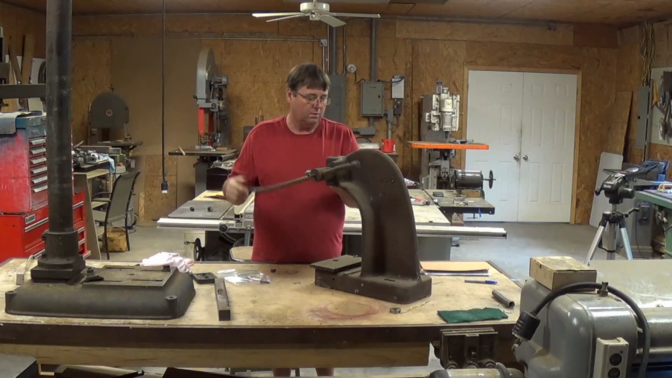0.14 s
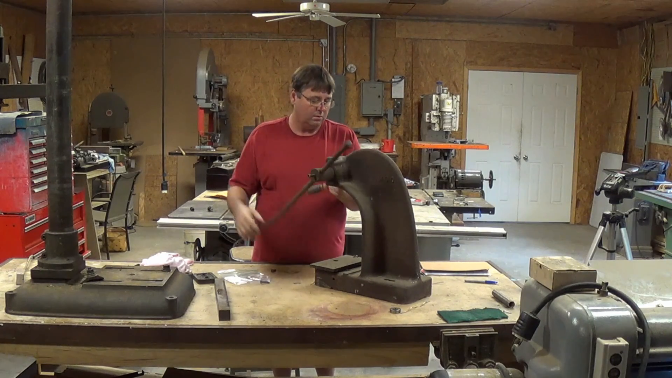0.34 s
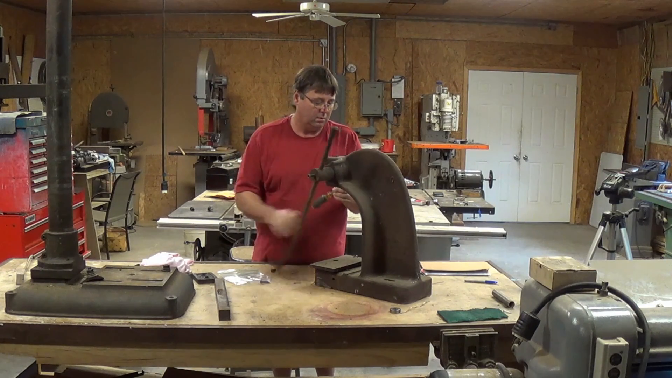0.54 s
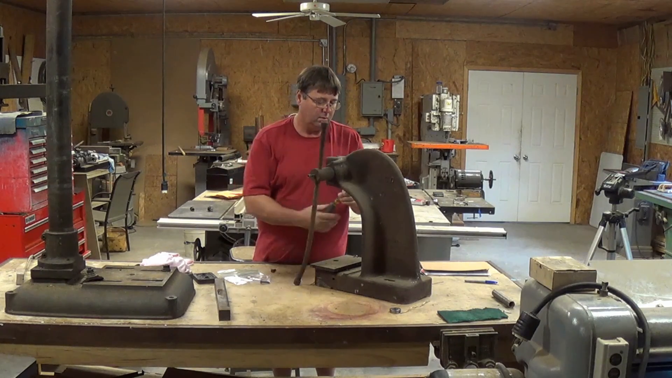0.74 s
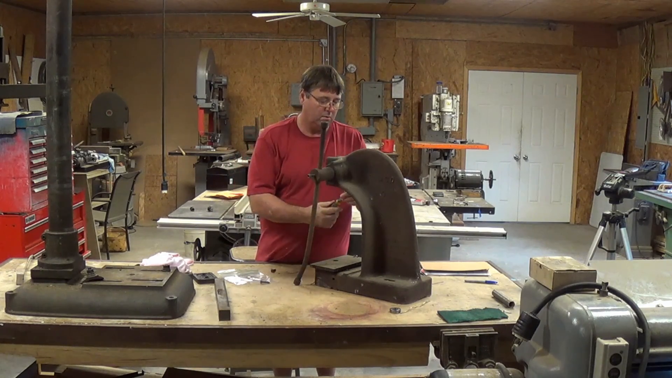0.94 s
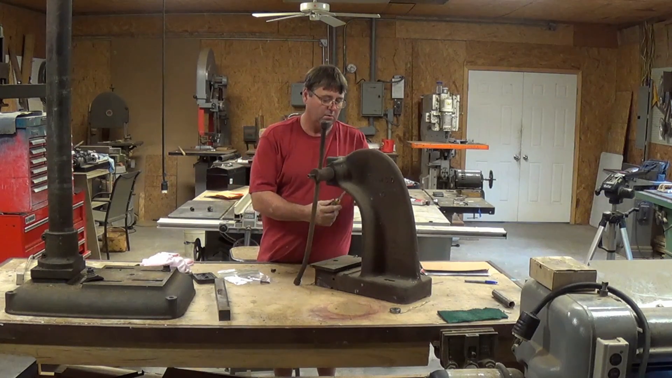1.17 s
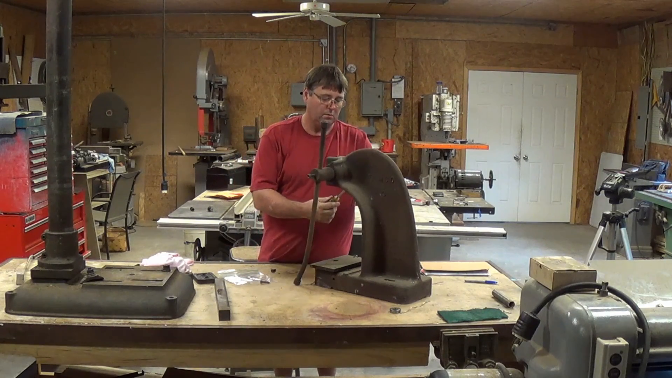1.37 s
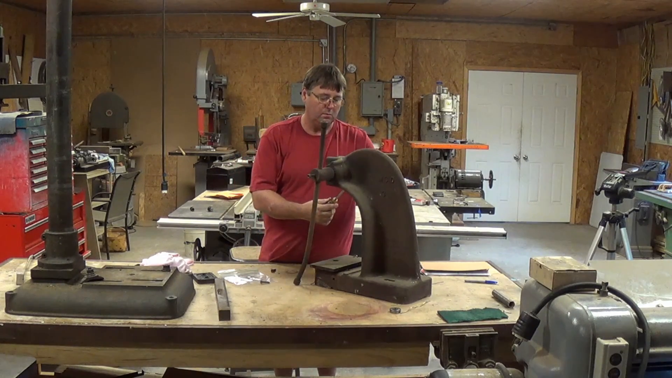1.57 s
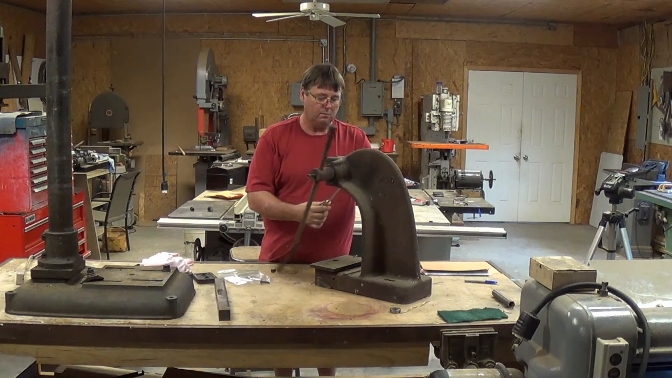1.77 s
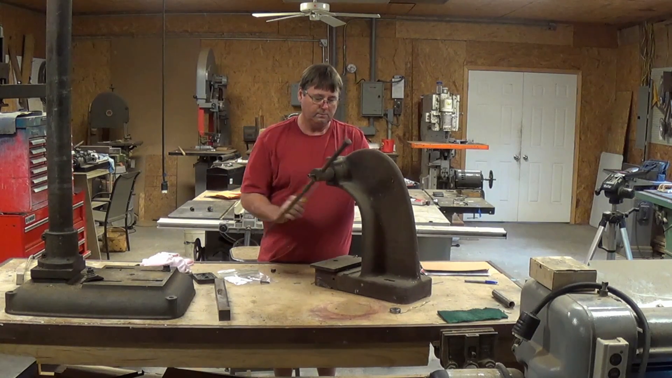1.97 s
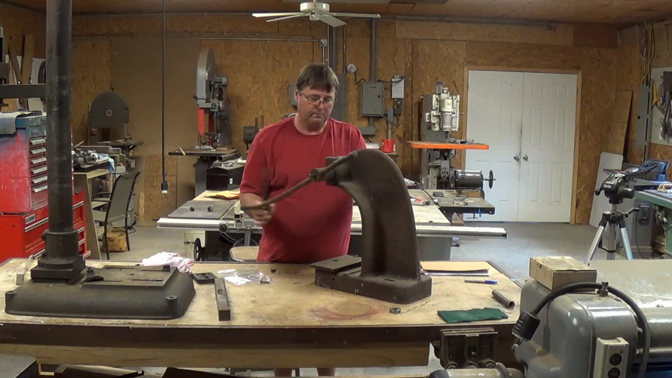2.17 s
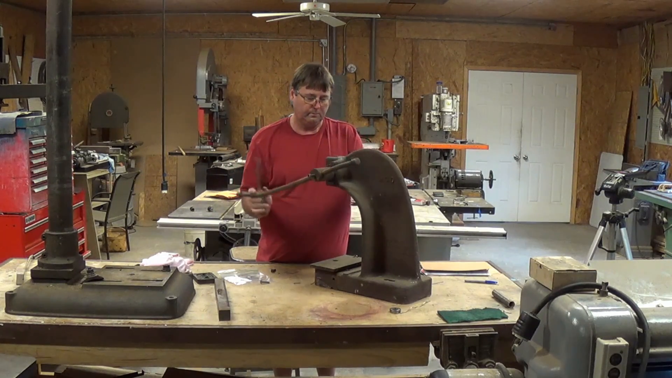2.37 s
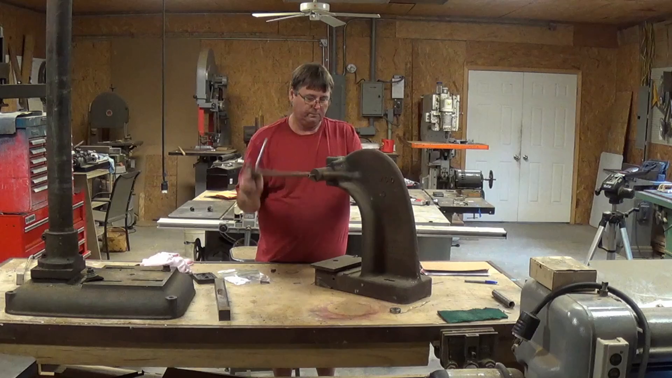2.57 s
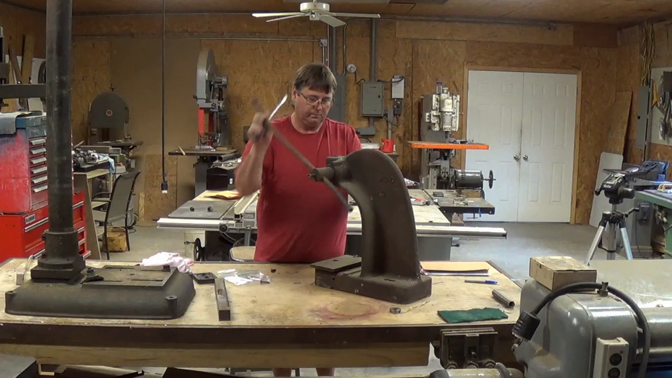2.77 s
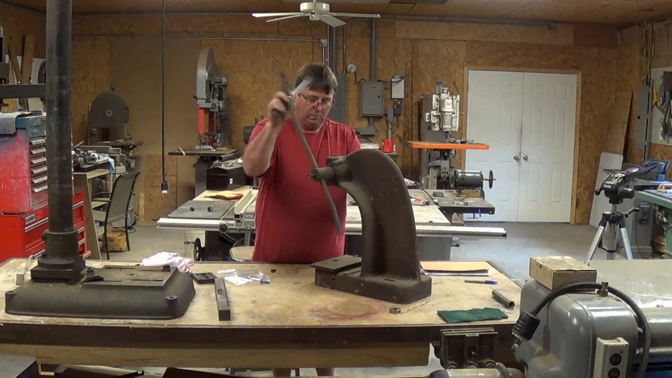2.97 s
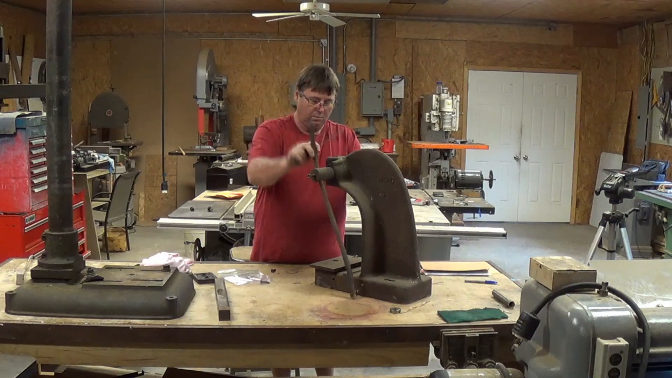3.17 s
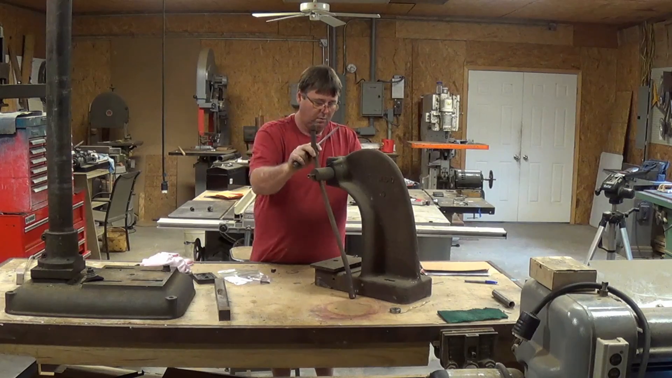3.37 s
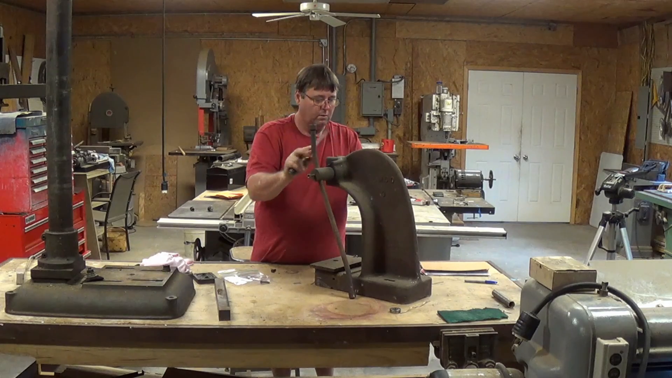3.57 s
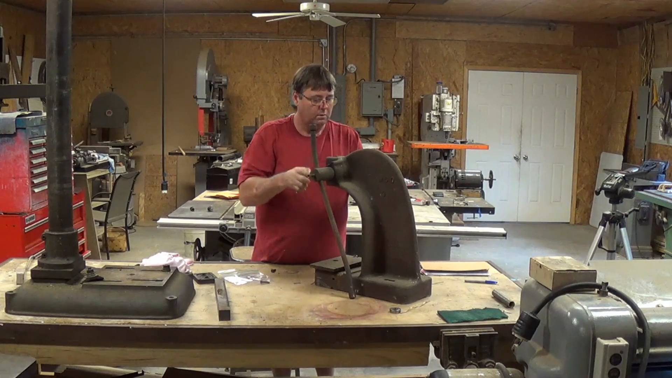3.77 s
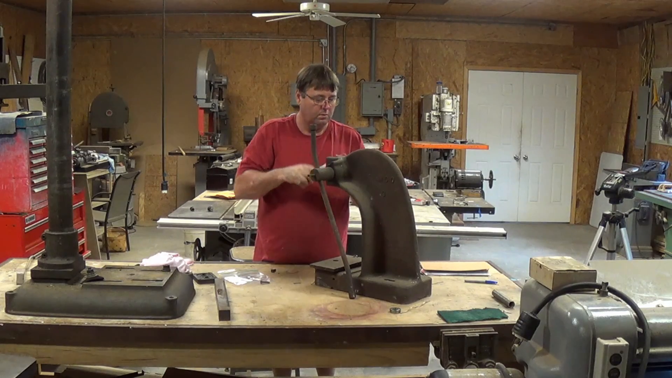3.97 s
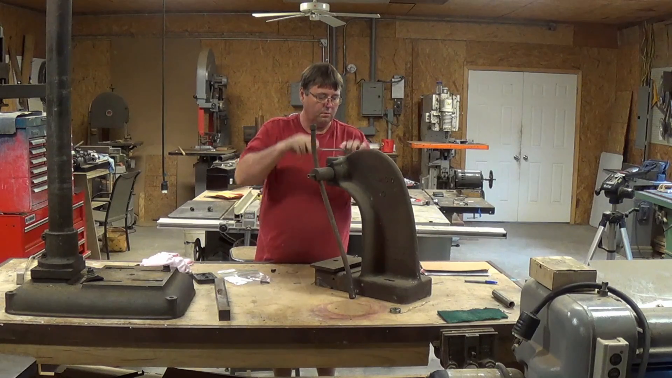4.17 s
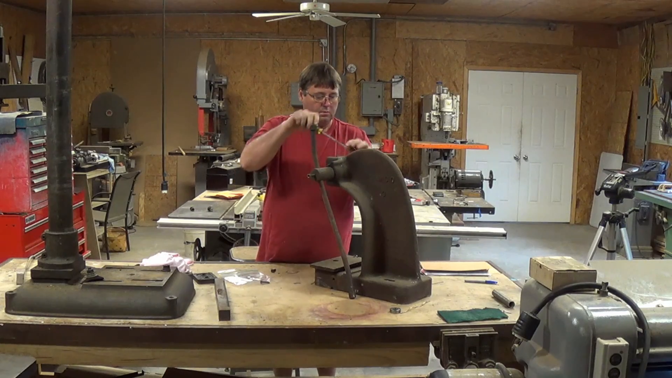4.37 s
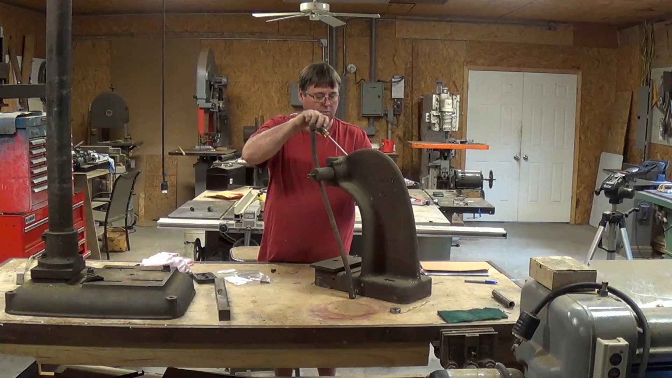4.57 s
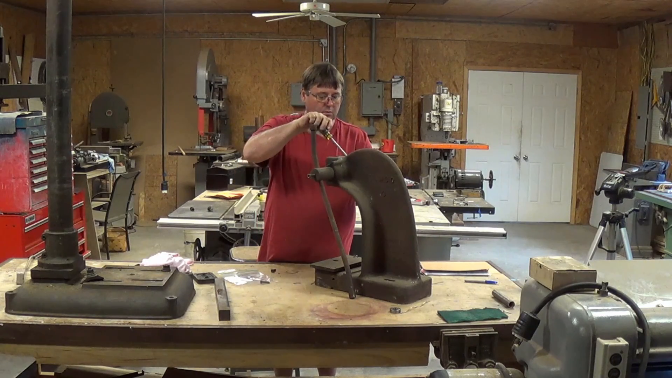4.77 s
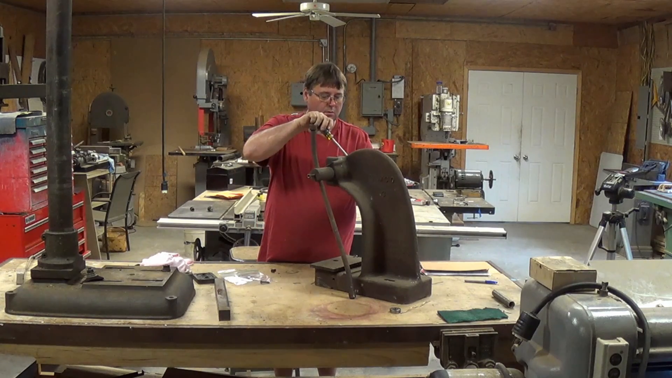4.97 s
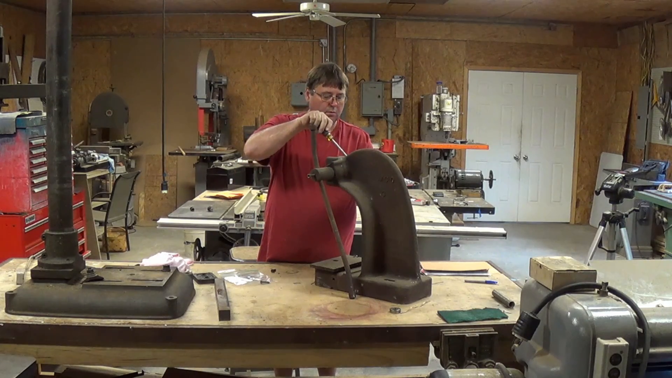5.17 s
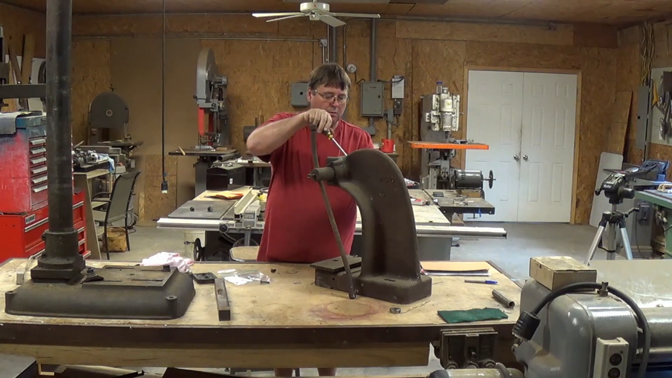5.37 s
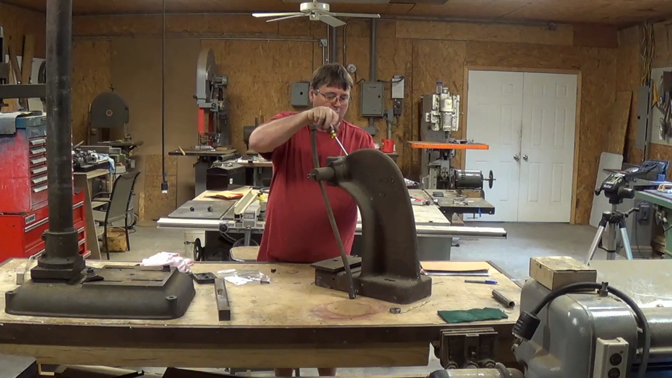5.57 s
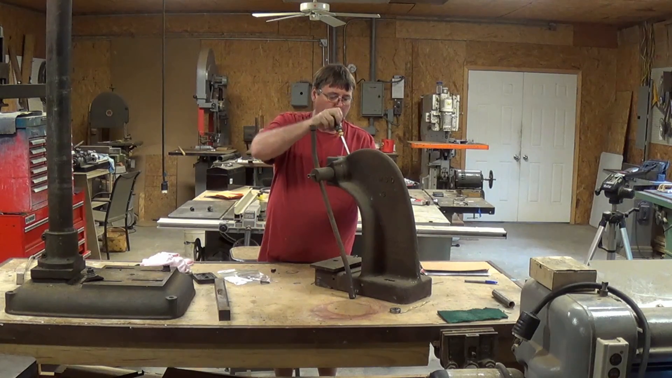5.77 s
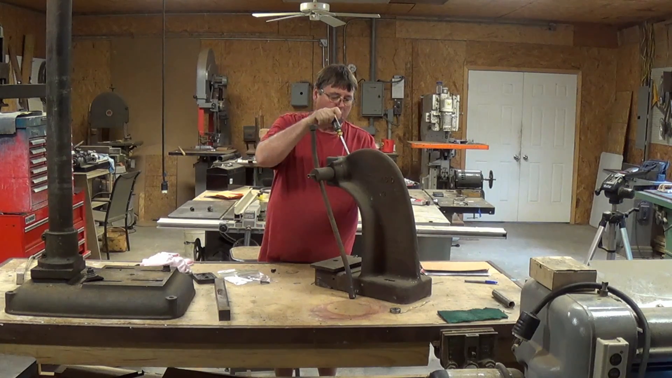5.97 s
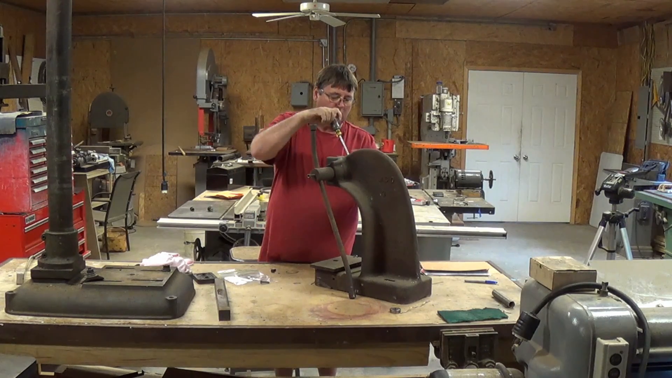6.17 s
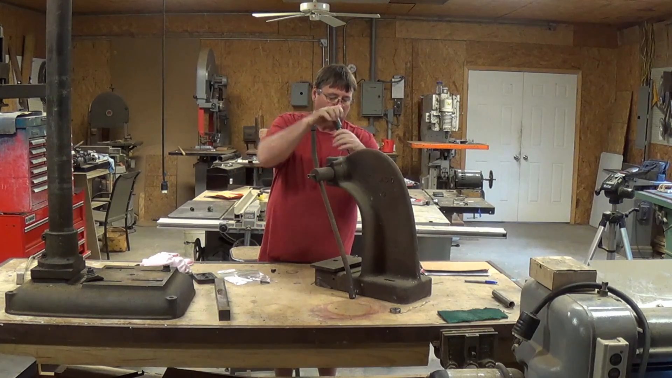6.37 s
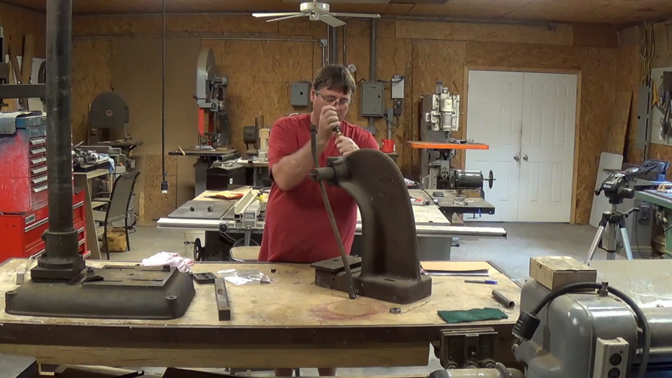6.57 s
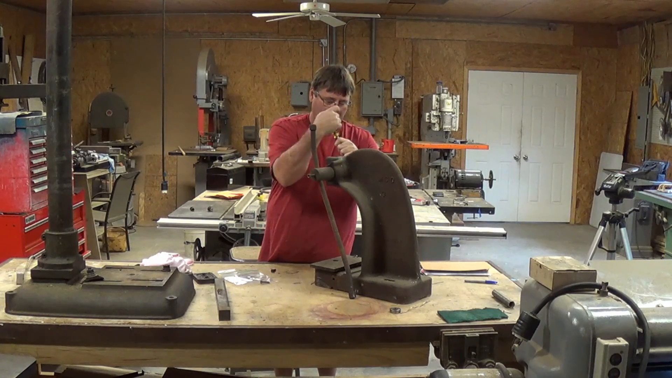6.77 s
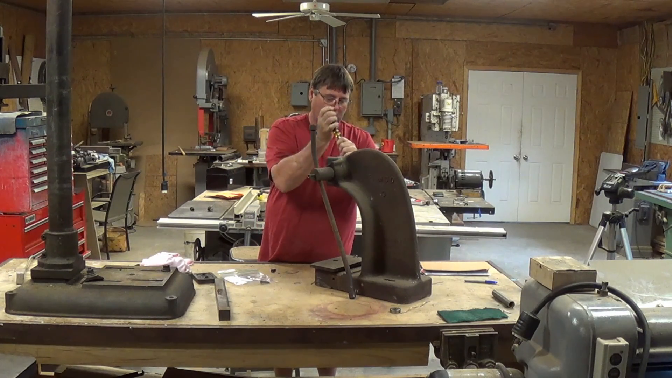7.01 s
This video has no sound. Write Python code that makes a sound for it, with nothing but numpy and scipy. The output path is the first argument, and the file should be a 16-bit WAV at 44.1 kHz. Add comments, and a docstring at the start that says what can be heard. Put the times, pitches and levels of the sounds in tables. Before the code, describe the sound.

Quiet steady motor whine, mains hum and soft air rush fill a live wooden workshop. Near the start a press gear knocks woodenly; later loose steel ticks and knocks gather into a short, swelling metallic slide that ends in an overwhelmingly loud bench thud with a short room tail. Afterwards a small steel tool gives two sharp, almost merged clicks on the press, then sparse faint ticks. Stereo microphone a few metres off, untouched by close handling.

```python
"""A wooden workshop: a hand works the steel lever of a bench press, heard by two microphone ports a few metres away.
The gear knocks, the lever bar slides through its hole and drops on the bench with a clunk, then a small tool
clicks on the ram. Blows and clicks excite decaying modes; the slide is noise shaped by the bar's resonances.
Behind them a motor whine (a harmonic series), mains hum and a rush of filtered noise; a limiter holds the clunk down
and a short low sine adds the thump of its clamping."""
import sys
import numpy as np
from scipy import signal
from scipy.fft import rfft, irfft, next_fast_len
from scipy.io import wavfile
from scipy.ndimage import uniform_filter1d, minimum_filter1d, map_coordinates

SR = 44100
rng = np.random.default_rng(int(sys.argv[2]) if len(sys.argv) > 2 else 0)


def store_pcm(level_fs):
    """Save levels as 16-bit WAV."""
    pcm = np.round(np.clip(level_fs, -1, 1) * 32767).astype(np.int16)
    wavfile.write(sys.argv[1], SR, np.atleast_2d(pcm).T)


N = 310464

# Blows on press and bench. Each row: start in seconds, strength in dB, contact time constant in ms,
# bench ring in dB and lever ring in dB, both relative to the blow.
BLOWS = [(.789, -8, 0.25, -23.5, -45.5), (1.289, -41.5, 0.41, -24, -30), (1.35, -36.5, 0.43, -26, -35),
         (2.295, -21.5, 0.43, -26, -40), (2.33, -24, 0.5, -16, -36.5), (2.47, -28.5, 0.7, -19, -44),
         (2.705, -31.5, 0.31, -38, -36), (2.723, -22, 0.19, -23, -45), (2.749, -24, 0.21, -33, -41),
         (2.85, -30, 0.25, -26, -37.5), (3.26, 27.5, 0.32, -27.5, -61), (4.03, -31, .44, -26.5, -41),
         (4.39, -34, 0.13, -18, -35.5), (4.766, -32, .08, -31, -40.5), (5.535, -34, 0.21, -31, -39)]
# Modes of the bench. Each row: frequency in Hz, level in dB, t60 in seconds before the damping factor.
BENCH_MODES = [(106.2, -7, 0.26), (127.3, 0.5, 0.35), (146.5, -0.5, 0.53), (180.7, -4.5, 0.49),
               (227.5, -11, 0.4), (284.8, -3.5, 0.38), (320, 1, 0.14), (406, -15, 0.26), (508, -9.5, 0.25),
               (558, -15.5, 0.31)]
# Bending modes of the lever bar. Each row: frequency in Hz, width in Hz, level in dB.
LEVER_MODES = [(371, 41, 0), (576, 38, -4), (834, 97, -6), (1150, 50, -6), (1590, 29, -10), (2300, 58, -6),
               (2700, 32, -11), (3200, 79, -6), (3630, 42, -13), (3920, 15, -20), (4270, 64, -2),
               (4680, 71, -24), (5420, 59, -12), (6010, 29, -29), (6630, 50, -7), (7260, 26, -15),
               (8020, 83, -14), (9520, 34, -8), (10000, 43, -31), (10700, 45, -21)]
# Soft touches that sound only the bar's lowest mode. Each row: start in seconds, level in dB.
TAPS = [(5.148, -47.5), (6.368, -50)]
TAP_ATTACK_S, TAP_T60_S = 0.005, 0.11
# A low thump as the limiter clamps down on the clunk. One row: frequency in Hz, level in dB, t60 in seconds.
THUMP = (50, -6, 0.03)

# The bar gathers speed down its hole. Each row: time in seconds, level in dB before the layer gains.
SLIDE_LEVEL = [(2.99, -80), (3.022, -69.5), (3.074, -50), (3.12, -48.5), (3.2, -40), (3.25, -33.5)]
SLIDE_END_S = 3.259
# Spectrum of the rubbing noise between the modes. Each row: frequency in Hz, density in dB per Hz.
SCRAPE_SPECTRUM = [(150, -19.5), (400, -9.5), (1200, -11.5), (3000, -15), (6000, -33), (11000, -26.5)]
LOW_MODES_DB, HIGH_MODES_DB, SCRAPE_DB = -8, -2.5, -3  # over the slide level
GROAN_S, GROAN_WIDTH_S, GROAN_DB = 3.1, 0.041, 15  # the bar breaks loose and its low modes groan
# The bar catches an edge and one mode sings on through the clunk.
# Each row: start in seconds, frequency in Hz, level in dB, t60 in seconds.
SINGING_MODES = [(3.198, 7250, -44.5, 0.39)]

# Small steel contacts damped by the hand.
# Each row: start in seconds, level in dB, tilt in dB per octave, contact t60 in ms.
HELD_CLICKS = [(0.789, -41, -10, 8.5), (2.481, -47, 1, 14), (2.724, -61, -17, 9.1), (3.258, -19, -9, 6.1),
               (4.016, -47, 0, 9.9), (4.754, -50.5, 0, 27), (5.134, -47, -5.5, 21), (5.519, -47.5, 0.5, 25),
               (5.534, -38.5, 1.5, 12.3)]
# The tool clicks on the ram: a faint dull onset, then two bright clicks 12 ms apart.
# Each row: start in seconds, level in dB, tilt in dB per octave, contact t60 in ms.
RAM_CLICKS = [(4.365, -44, -7.5, 5), (4.3722, -22, 3, 19), (4.384, -22.5, 1.7, 22)]
# Modes of the small tool and the ram. Each row: frequency in Hz, level in dB,
# t60 in seconds before the damping factor.
TOOL_MODES = [(1930, -11, .2), (2204, -9, .25), (2317, -5, .3), (2416, 0, .4), (2468, -5, .3),
              (2820, -5, .3), (3052, -4.5, .35), (3812, 2, .32), (3948, -8, .35), (4550, -14, .25),
              (4716, -12, .3), (5550, -17, .2), (6300, -8, .35), (6450, -12, .3), (7024, -10, .35),
              (7197, -12, .3), (7540, -12, .3), (7973, -13, .3), (8489, -12, .3), (9083, -6, .25),
              (9300, -12, .2), (10760, -16, .25)]
# Colour of a steel contact. Each row: frequency in Hz, density in dB per Hz before the crack gain.
CRACK_SPECTRUM = [(410, -50), (900, -7.5), (1640, -14), (2400, -3.5), (3300, -8), (3900, -11.5),
                  (4600, -17), (5080, -19), (5600, -12.5), (6050, -22), (6470, -12), (8000, -11.5),
                  (11000, -16), (22000, -120)]
CRACK_ATTACK_S, CRACK_GAIN_DB = 0.0008, 10.0
HELD_RING_DB, FREE_RING_DB = -31, -15  # level of the mode sum before the click level

# Harmonics of the motor. Each row: multiple of the fundamental, level in dB rms before the left-right lean.
WHINE_HARMONICS = [(1, -61.5), (3, -74.5), (4, -80.5), (5, -80), (6, -89), (8, -83), (11, -100),
                   (12, -94.5), (13, -98)]
WHINE_HZ = 679.8
# Mains hum and faint steady tones. Each row: frequency in Hz, level in dB before a common gain.
STEADY_TONES = [(60, -76.5), (180, -80.5), (485, -87.5), (2369, -85.5), (2562, -82.5)]
# Spectrum of motor rush and room air. Each row: frequency in Hz, relative density in dB per Hz.
AIR_SPECTRUM = [(12, -44), (59, -16), (114, -16.5), (528, -16.5), (670, -13.5), (896, -5), (1400, -18),
                (1700, -15), (2260, -22), (2700, -16), (3630, -23.5), (6500, -28.5), (8000, -24),
                (11000, -29.5)]
# Likeness of the air noise in the two channels. Each row: frequency in Hz, left-right correlation.
AIR_LIKENESS = [(60, 1), (270, 0.76), (900, 0.83), (2500, 0.17), (6000, 0.75), (11000, 0.77)]
AIR_DB = -62  # rms, before lean and buzz
BUZZ_HZ, BUZZ_DB = 60, 1.3  # the rush pulses briefly once a mains cycle

# Reverberation of the workshop. Each row: frequency in Hz, t60 in seconds.
ROOM_T60 = [(60, 0.57), (200, 0.64), (1000, 0.59), (3000, 0.56), (10000, 0.39)]
# The two microphone ports. Each row: frequency in Hz, phase in radians by which the left leads.
PORT_PHASE = [(30, .4), (140, .95), (340, .95), (2500, .4), (6600, .35), (11000, 0)]
LIMIT_DB, LIMIT_HOLD_S, TOP_HZ = -4.5, 0.0101, 11050
LEFT_RIGHT = np.array([[1], [-1]])


def amp(db):
    """Level in dB to amplitude ratio."""
    return 10 ** (np.asarray(db) / 20)


def unit(x):
    """Normalization to an rms of one."""
    return x / np.sqrt(np.mean(x ** 2) + 1e-20)


def along(points, hz):
    """Linear interpolation of (Hz, value) points on a logarithmic frequency axis."""
    f, v = np.transpose(points)
    return np.interp(np.log(hz + 1), np.log(f + 1), v)


def filtered(x, response):
    """Linear filtering: the spectrum of x times a complex response of frequency."""
    m = next_fast_len(x.shape[-1] + SR // 4)
    spectrum = rfft(x, m) * response(np.fft.rfftfreq(m, 1 / SR))
    return irfft(spectrum, m)[..., :x.shape[-1]]


def ringing(modes, t, spread_db, damping):
    """Modal superposition: decaying sines struck at fresh strengths; damping multiplies every t60."""
    hz, db, t60 = np.transpose(modes)[:, :, None]
    struck_db = db + spread_db * rng.standard_normal(hz.shape)
    strength = amp(struck_db - 60 * t / (t60 * damping))
    return np.sum(strength * np.sin(2 * np.pi * hz * t), axis=-2)


def room(x, wet_db, likeness):
    """Reverberation: direct sound plus a fresh stereo noise tail, each frequency decaying at its own rate."""
    hz, t, z = signal.stft(rng.standard_normal((2, SR * 3 // 4)), SR, nperseg=256)
    decay = amp(-60 * t / along(ROOM_T60, hz)[:, None])
    a, b = signal.istft(z * decay, SR, nperseg=256)[1]
    turn = np.arccos(np.clip(likeness, 0, 1)) / 2  # mixing angle for the wanted correlation
    tail = np.cos(turn) * a + np.sin(turn) * b * LEFT_RIGHT
    tail = amp(wet_db) * tail / np.linalg.norm(a)
    tail = np.pad(tail, ((0, 0), (round(.003 * SR), 0)))  # the nearest surfaces answer 3 ms late
    tail[:, 0] = 1  # direct sound
    return signal.fftconvolve(x[None], tail, axes=1)


def add(out, s, x):
    """Superposition: mix x into out from second s."""
    part = out[:, round(s * SR):][:, :x.shape[1]]
    part += x[:, :part.shape[1]]


def blows():
    """Impact: a softer contact gives a longer push; the lever's low modes ring and the bench's boom builds up."""
    out, t = np.zeros((2, N)), np.arange(SR * 3 // 4) / SR
    # a wide mode dies fast
    held = [(hz, db + 3.66 * np.log2(hz / 370), 3.93 / width) for hz, width, db in LEVER_MODES if hz < 3000]
    for s, db, contact_ms, bench_db, lever_db in BLOWS:
        build_up = 1 - np.exp(-t / 0.021)
        boom = amp(bench_db) * ringing(BENCH_MODES, t, spread_db=1.95, damping=0.94) * build_up
        bar = amp(lever_db) * ringing(held, t, spread_db=4, damping=1)
        impulse = t == 0
        in_room = room(bar + impulse, wet_db=14.5, likeness=0.86)[:, :len(t)]
        sound = in_room + boom + amp(15.5) * bar
        soft = 2e-3j * np.pi * contact_ms
        # the microphone's low cut removes deep bass from the blows, and a long contact dulls the treble
        contact = lambda f: (1j * f / (75 + 1j * f)) ** 4 / (1 + soft * f) ** 2
        add(out, s, amp(db) * filtered(sound, contact))
    return out


def soft_taps():
    """Selective excitation: a touch with a slow onset sounds only the bar's lowest mode."""
    out, t = np.zeros((2, N)), np.arange(SR * 3 // 4) / SR
    lowest_hz = LEVER_MODES[0][0]
    for s, db in TAPS:
        envelope = amp(db - 60 * t / TAP_T60_S) * (1 - np.exp(-t / TAP_ATTACK_S))
        add(out, s, room(envelope * np.sin(2 * np.pi * lowest_hz * t), wet_db=-4, likeness=0.96))
    return out


def limiter_thump():
    """Exponential decay: a short decaying low sine, stronger on the right."""
    out, t = np.zeros((2, N)), np.arange(SR * 3 // 4) / SR
    hz, db, t60 = THUMP
    thump = amp(db - 60 * t / t60) * np.sin(2 * np.pi * hz * t)
    add(out, SLIDE_END_S, thump * amp([[-4], [3]]))
    return out


def rubbed_bar(seconds, pick, judder_db):
    """Friction: noise through the bar modes that pick selects; the grip on each mode stutters on its own."""
    n = len(seconds)
    total = np.zeros(n)
    for centre, width, db in (m for m in LEVER_MODES if pick(m[0])):
        stutter = map_coordinates(rng.standard_normal(40), [(seconds - seconds[0]) * 70])
        band = lambda f: 1j * f * width / (centre * centre - f * f + 1j * f * width)
        mode = filtered(rng.standard_normal(n), lambda f: amp(db) * band(f) ** 1.32)
        total += amp(judder_db * stutter) * mode
    return total


def slide():
    """Sliding friction: rough steel on steel shakes the bar until the bench stops it."""
    s, level_db = np.transpose(SLIDE_LEVEL)
    t = np.arange(s[0], SLIDE_END_S, 1 / SR)
    low = rubbed_bar(t, lambda hz: hz < 2000, judder_db=1.5)
    high = rubbed_bar(t, lambda hz: hz > 2000, judder_db=3)
    grains = rng.standard_normal(len(t)) * amp(6.3 * rng.standard_normal(len(t)))
    scrape = filtered(grains, lambda f: amp(along(SCRAPE_SPECTRUM, f)))
    groan_db = GROAN_DB * np.exp(-((t - GROAN_S) / GROAN_WIDTH_S) ** 2)
    dry = amp(LOW_MODES_DB + groan_db) * unit(low)
    dry += amp(HIGH_MODES_DB) * unit(high) + amp(SCRAPE_DB) * unit(scrape)
    out = np.zeros((2, N))
    add(out, s[0], room(amp(np.interp(t, s, level_db)) * dry, wet_db=1.0, likeness=0.79))
    return out


def singing_bar():
    """Free vibration: one bar mode, set off by an edge, decays as a pure sine."""
    out, t = np.zeros((2, N)), np.arange(SR // 2) / SR
    for s, hz, db, t60 in SINGING_MODES:
        sine = amp(db - 60 * t / t60) * np.sin(2 * np.pi * hz * t)
        add(out, s, room(sine, wet_db=-2, likeness=0.47))
    return out


def clicks():
    """Impact of small steel parts: a crack or short rustle of noise, and the modal ring of the tool."""
    out, t = np.zeros((2, N)), np.arange(SR // 3) / SR
    held = [(*row, HELD_RING_DB) for row in HELD_CLICKS]
    free = [(*row, FREE_RING_DB) for row in RAM_CLICKS]
    for s, db, tilt_db, contact_ms, ring_db in held + free:
        envelope = amp(-60e3 * t / contact_ms) * (1 - np.exp(-t / CRACK_ATTACK_S))
        noise = envelope * rng.standard_normal(len(t))
        crack = filtered(noise, lambda f: amp(along(CRACK_SPECTRUM, f) + CRACK_GAIN_DB))
        hit = crack + amp(ring_db) * ringing(TOOL_MODES, t, spread_db=2.0, damping=0.21)
        tilt = lambda f: amp(tilt_db * np.log2(np.maximum(f, 1200) / 4000))
        add(out, s, amp(db) * room(filtered(hit, tilt), wet_db=1.5, likeness=0.79))
    return out


def motor_whine(t):
    """Harmonic series of a rotating motor close by: nearly steady speed, louder on the right."""
    drift = 0.1 * map_coordinates(rng.standard_normal(80), [t * 8])  # radians
    turn = 2 * np.pi * WHINE_HZ * t + drift + 0.098 * LEFT_RIGHT
    whine = np.zeros((2, N))
    for k, db in WHINE_HARMONICS:
        level = amp(db + 3 - 1.03 * LEFT_RIGHT)  # +3 dB: rms to peak
        whine += level * np.sin(k * turn + rng.uniform(0, 2 * np.pi))
    return whine


def steady_tones(t):
    """Stationary sines: mains hum and faint tones at random phases, equal in both channels."""
    return sum(amp(db + 3.5) * np.sin(2 * np.pi * hz * t + rng.uniform(0, 2 * np.pi)) for hz, db in STEADY_TONES)


def air_rush(t):
    """Partly coherent noise: a shared mid and an opposed side set the left-right correlation by frequency."""
    def mid_side(f):
        turn = np.arccos(np.clip(along(AIR_LIKENESS, f), 0, 1)) / 2
        return amp(along(AIR_SPECTRUM, f)) * np.array([np.cos(turn), np.sin(turn)])
    mid, side = filtered(rng.standard_normal((2, N)), mid_side)
    buzz_db = BUZZ_DB * np.cos(np.pi * BUZZ_HZ * t) ** 8
    return amp(AIR_DB - .5 * LEFT_RIGHT + buzz_db) * unit(mid + LEFT_RIGHT * side)


def background():
    """Superposition of the stationary sources: whine, steady tones and rush."""
    t = np.arange(N) / SR
    return motor_whine(t) + steady_tones(t) + air_rush(t)


def scene():
    """Phase difference: sounds from the bench reach the left port a little first."""
    ports = lambda f: np.exp(.5j * along(PORT_PHASE, f) * LEFT_RIGHT)
    work = blows() + soft_taps() + limiter_thump() + slide() + singing_bar() + clicks()
    return filtered(work, ports) + background()


def record(dry):
    """Peak limiting: gain ducks at once, holds about ten milliseconds and lets go; then a steep low-pass."""
    needed = np.minimum(1, amp(LIMIT_DB) / (np.abs(dry).max(axis=0) + 1e-9))
    hold = round(LIMIT_HOLD_S * SR)
    held = minimum_filter1d(needed, hold, origin=hold // 2 - 40)  # looks 40 samples ahead
    gain = uniform_filter1d(held, 80)
    return filtered(dry * gain, lambda hz: hz < TOP_HZ)


dry = scene()
out = record(dry)
store_pcm(out)
```